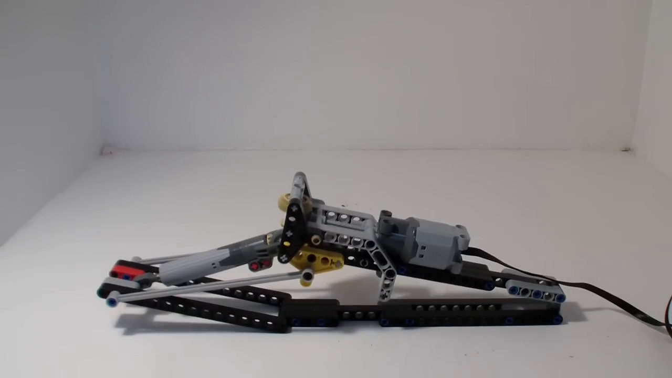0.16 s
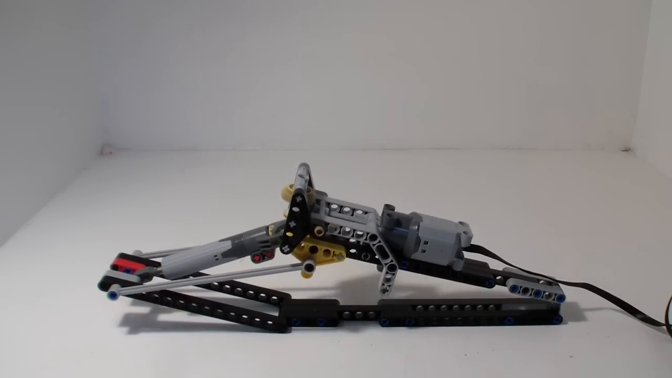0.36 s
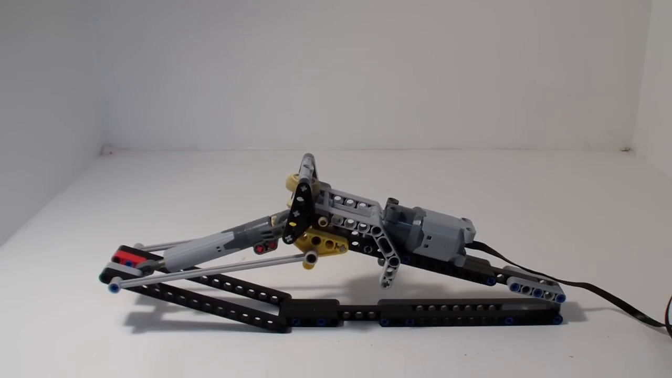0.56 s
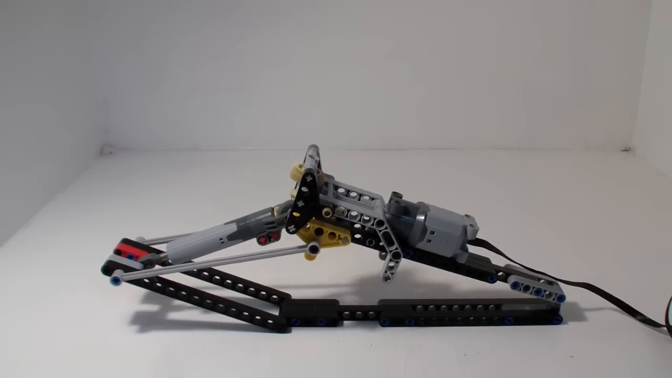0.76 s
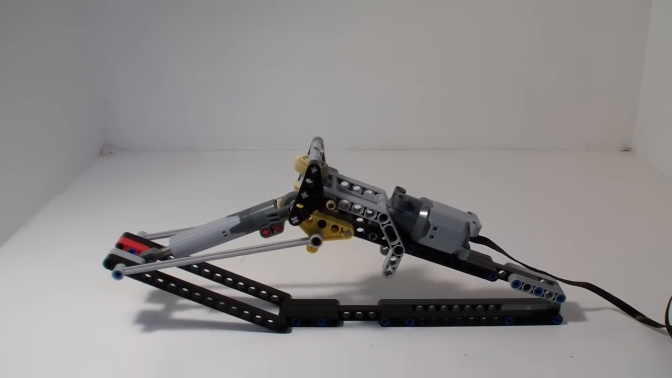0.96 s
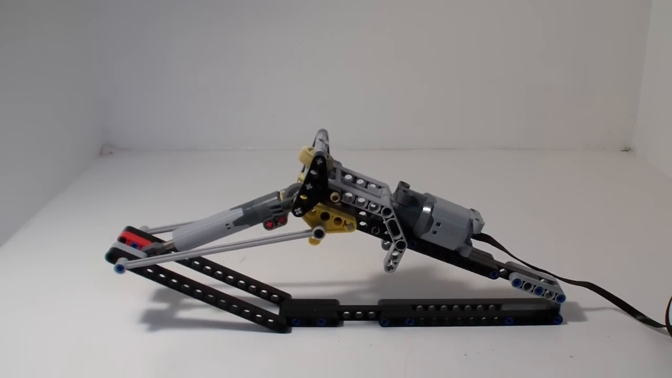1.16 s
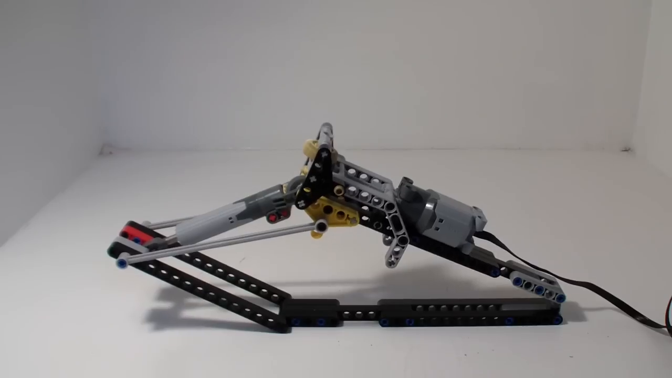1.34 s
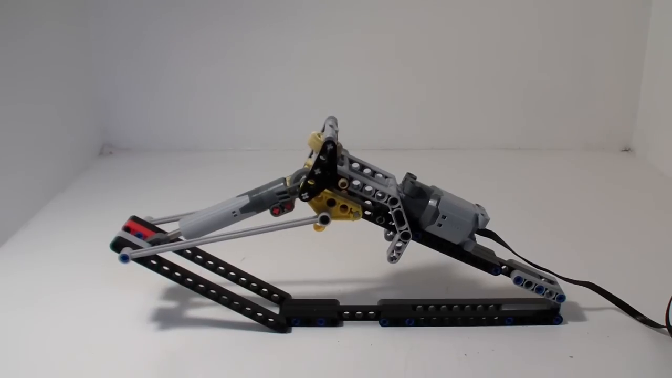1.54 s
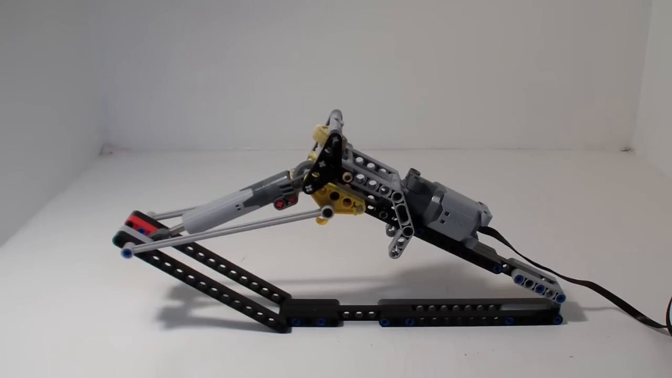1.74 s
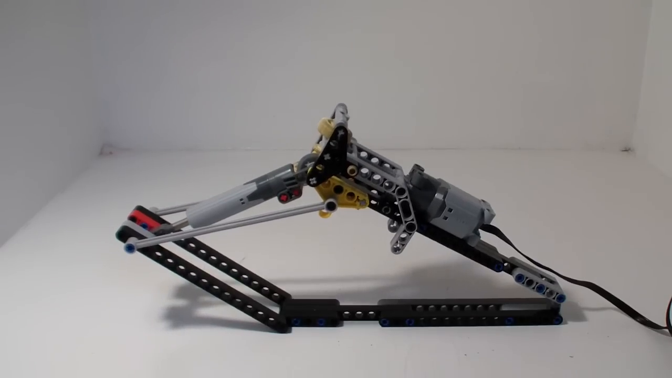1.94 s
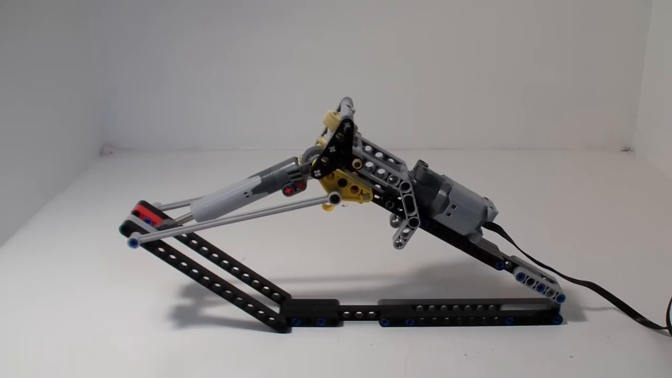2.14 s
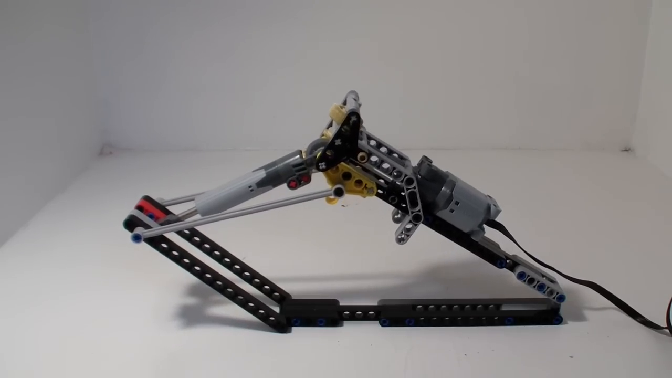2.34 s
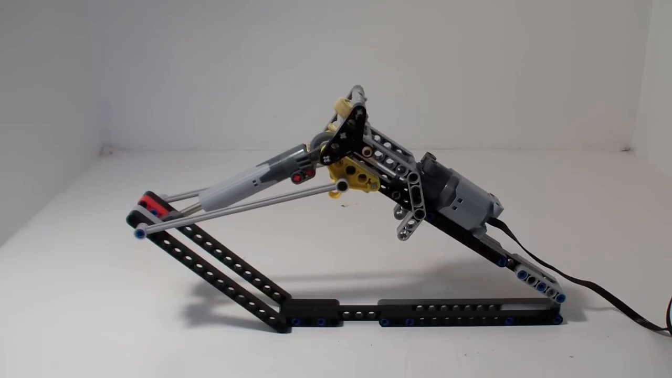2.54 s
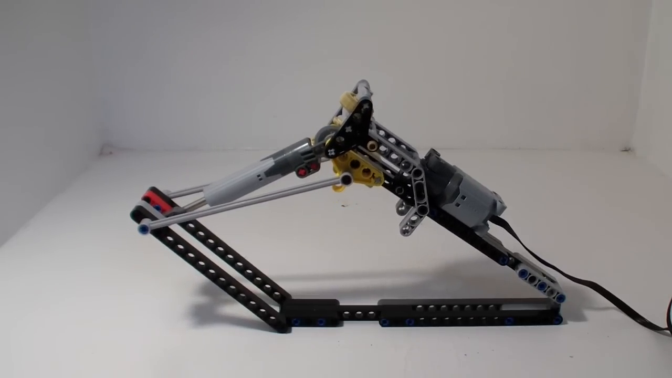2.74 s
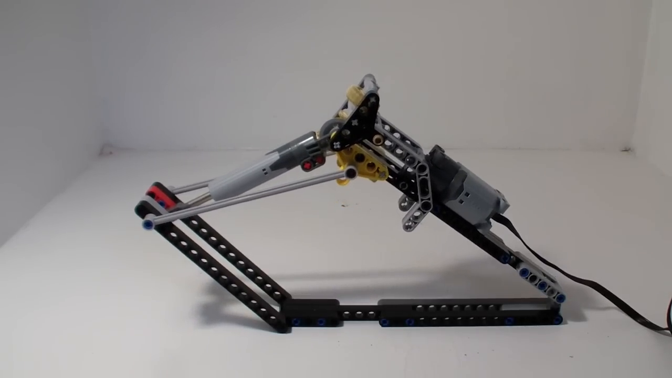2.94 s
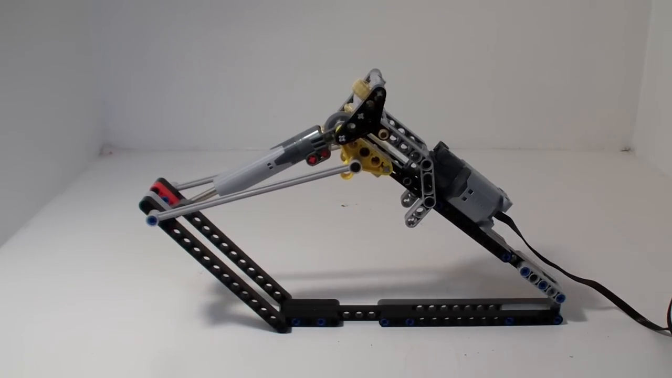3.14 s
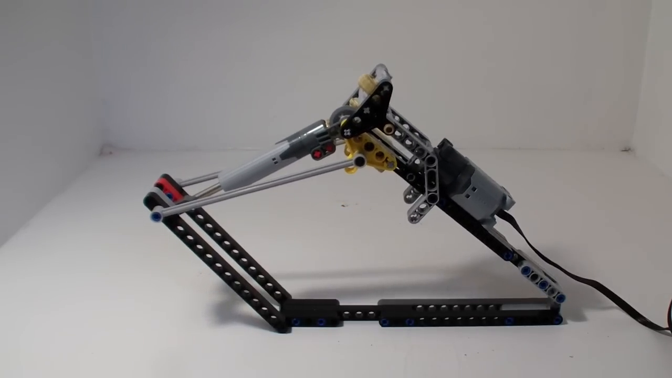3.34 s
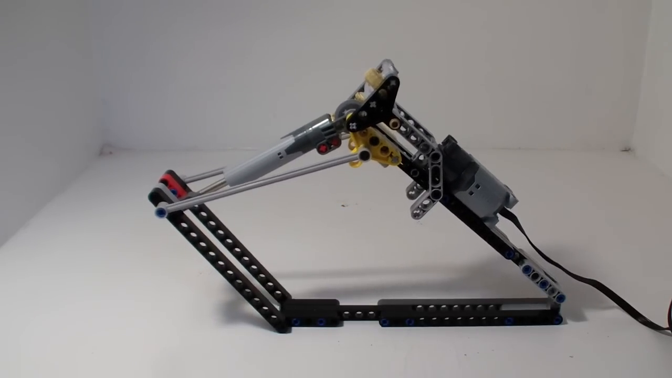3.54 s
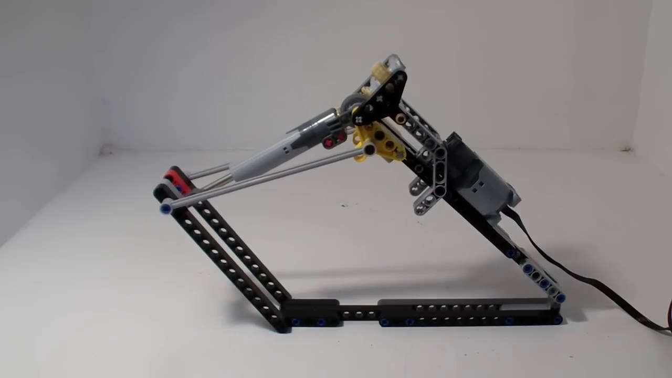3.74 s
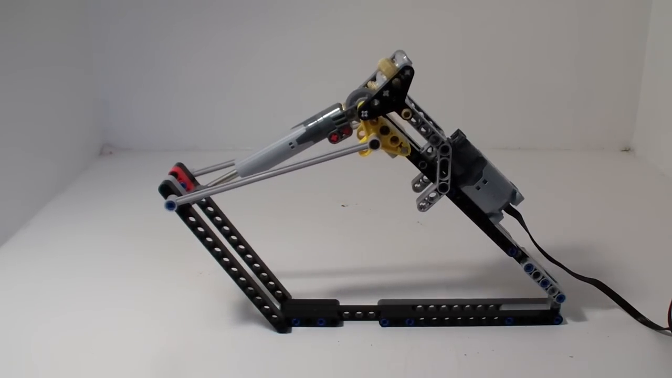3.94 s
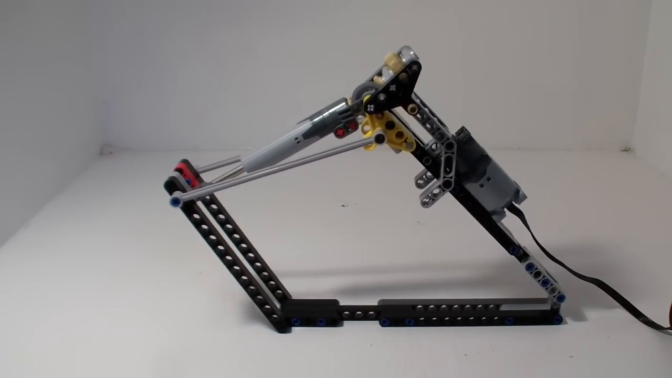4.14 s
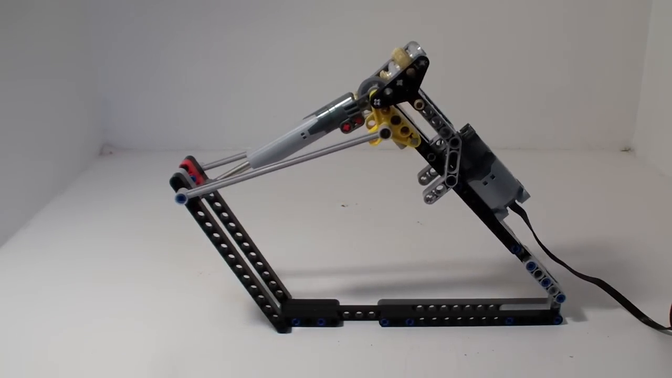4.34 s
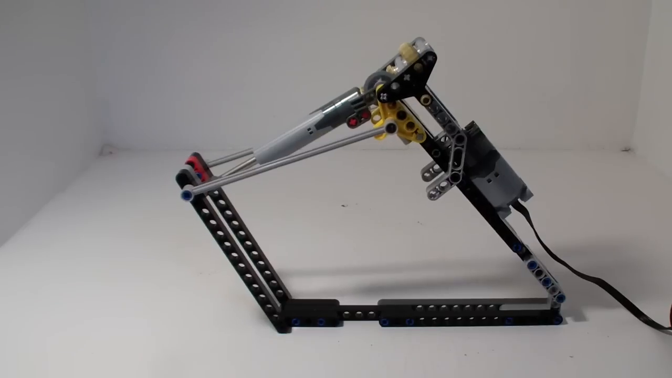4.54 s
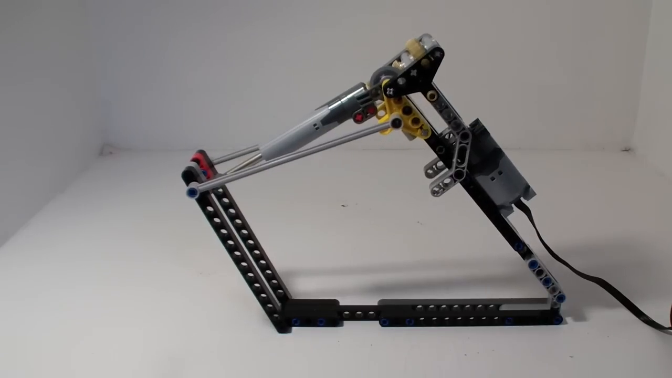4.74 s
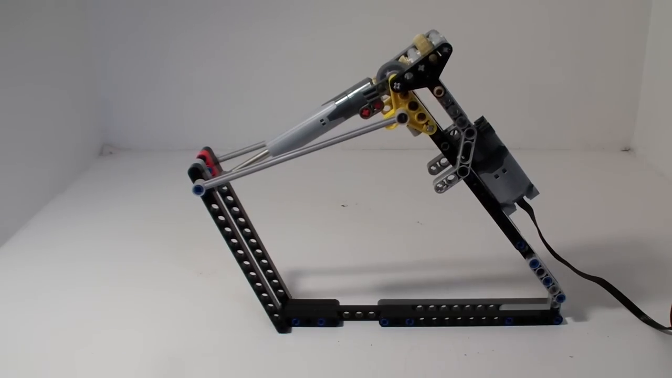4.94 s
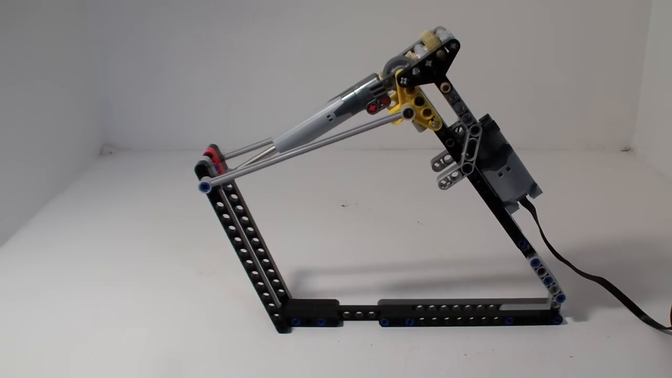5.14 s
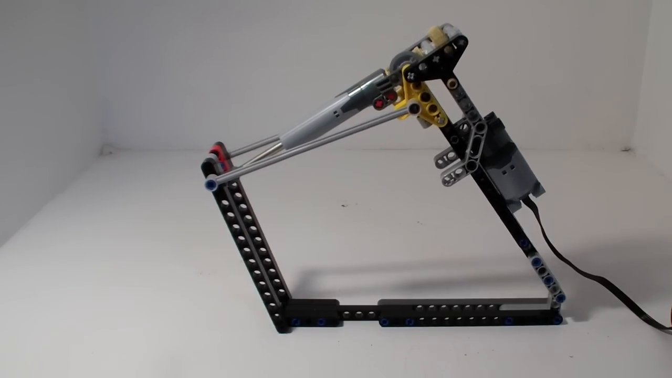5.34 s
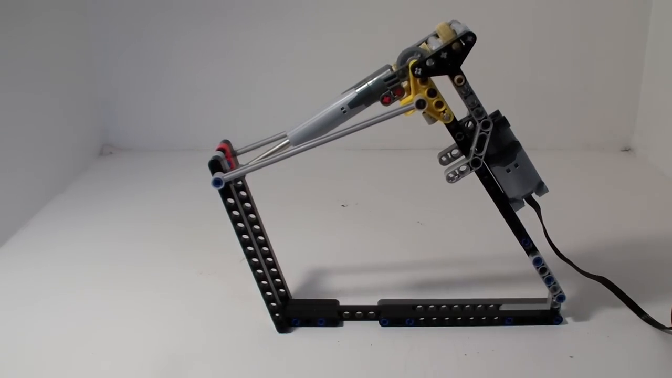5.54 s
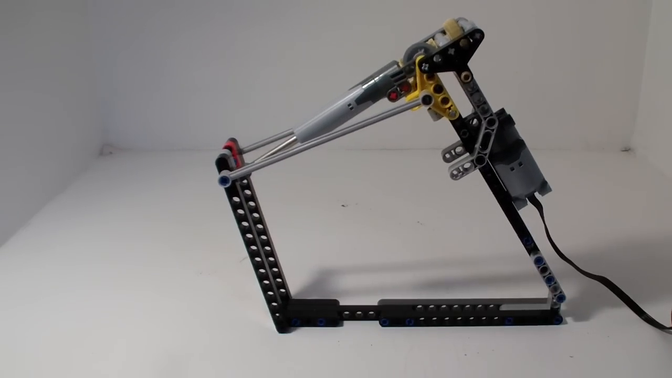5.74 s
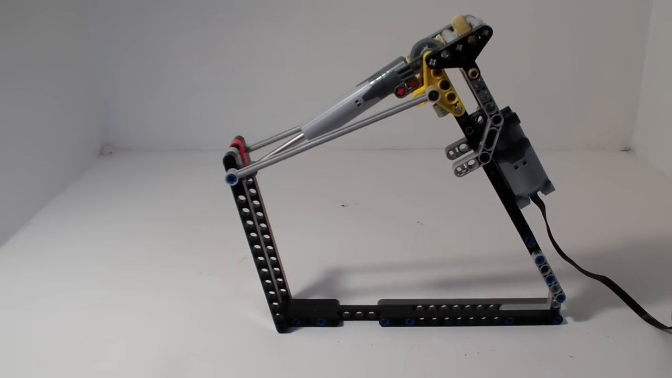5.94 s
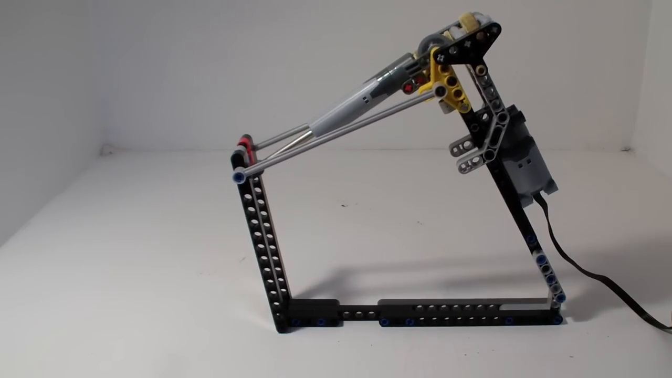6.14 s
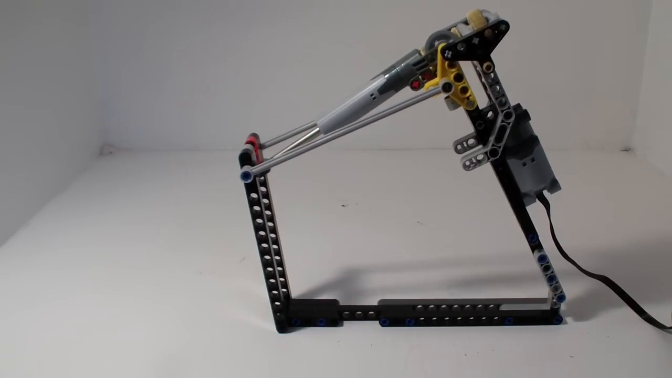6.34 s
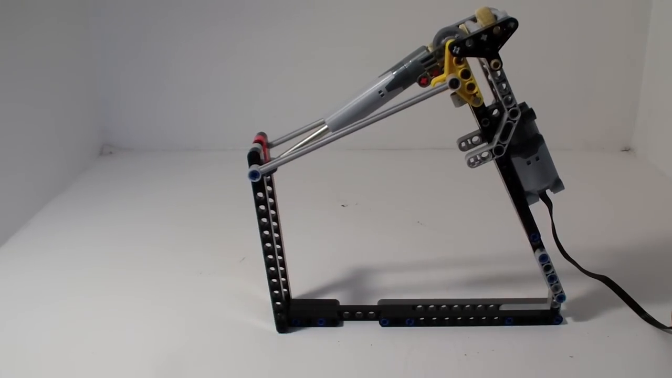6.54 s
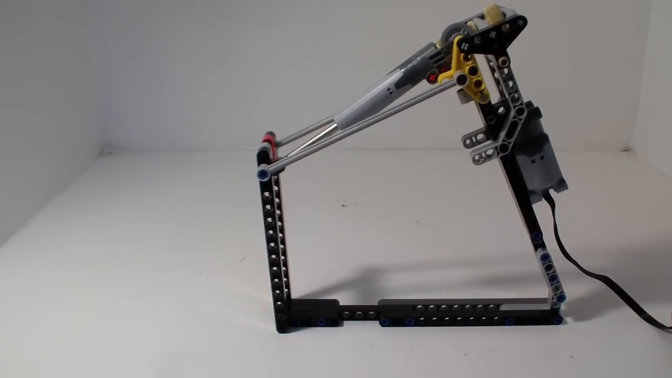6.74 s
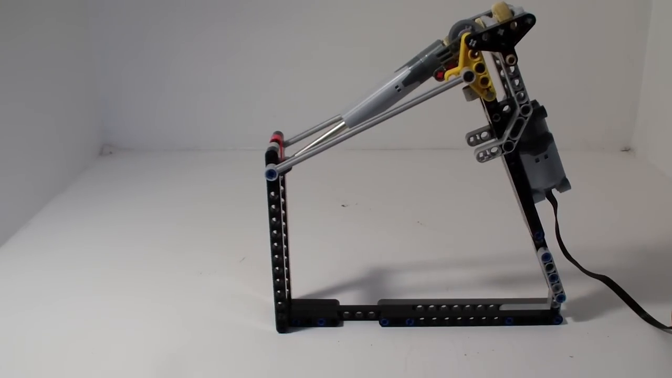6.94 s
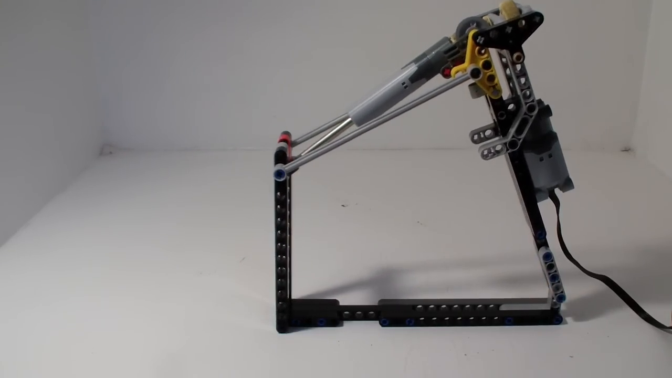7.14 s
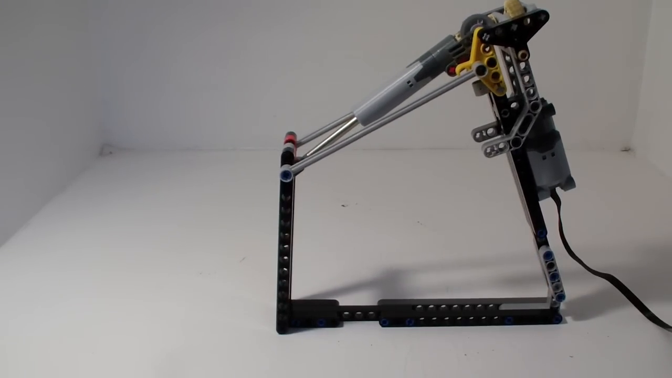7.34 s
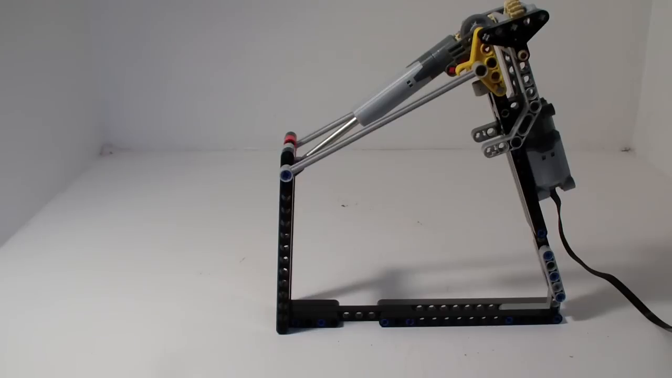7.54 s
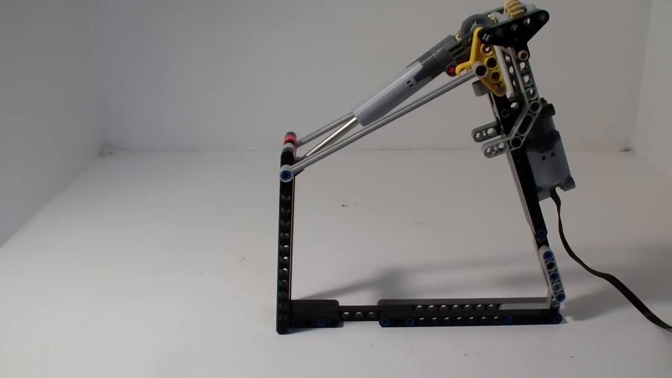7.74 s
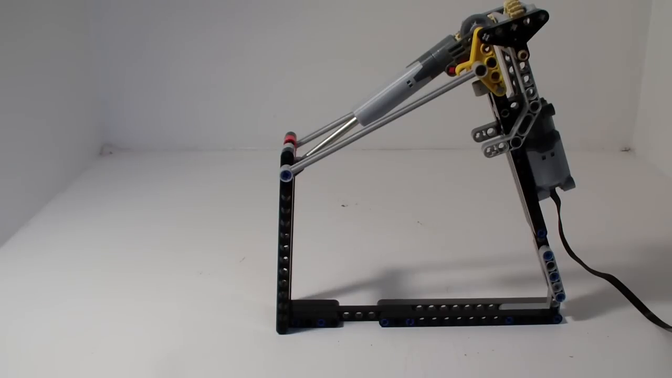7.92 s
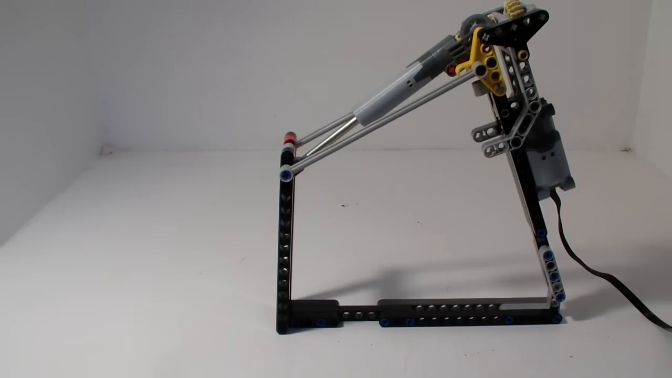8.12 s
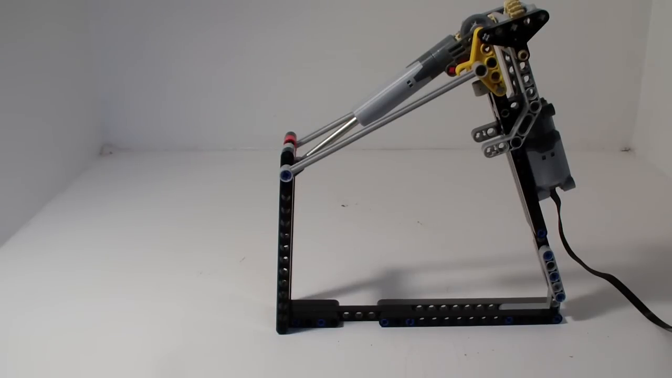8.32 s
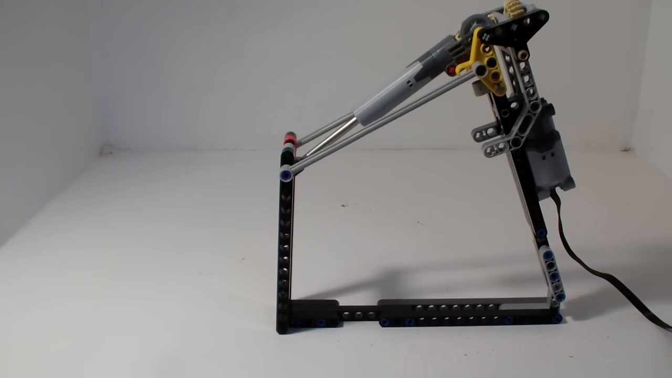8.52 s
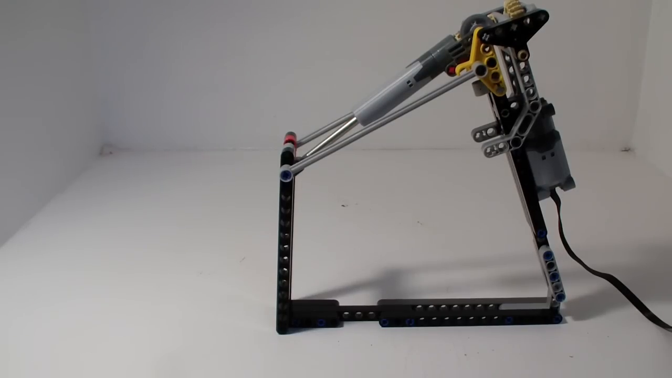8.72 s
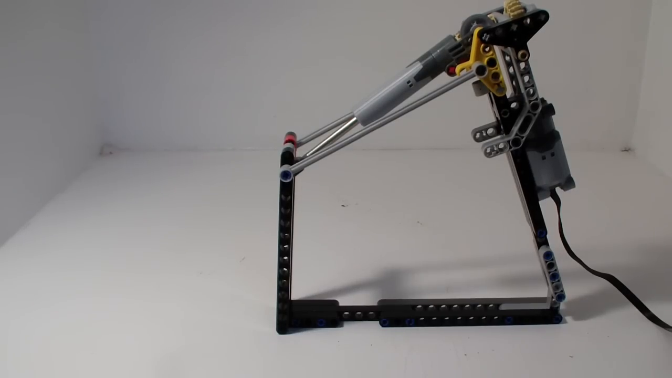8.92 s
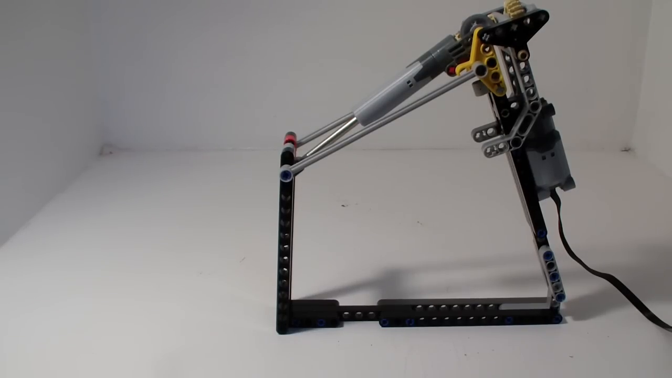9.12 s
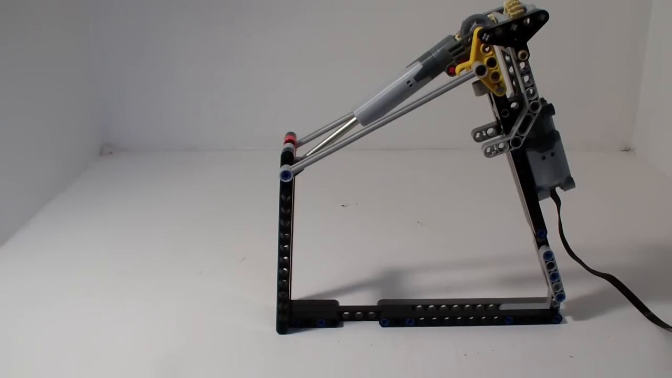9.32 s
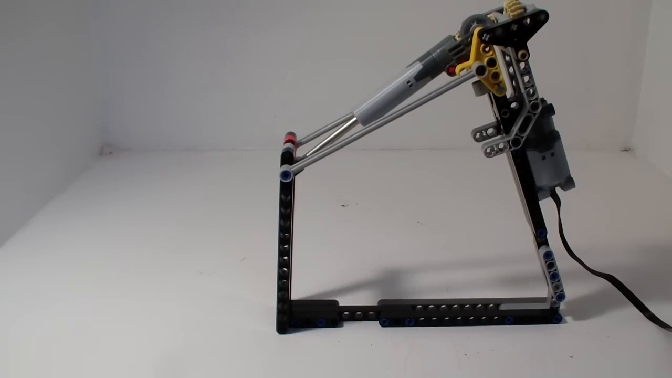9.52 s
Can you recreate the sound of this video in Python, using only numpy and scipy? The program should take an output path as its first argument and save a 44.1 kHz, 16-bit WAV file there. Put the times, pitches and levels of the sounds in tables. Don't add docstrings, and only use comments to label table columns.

```python
import sys
import numpy as np
from scipy import signal
from scipy.fft import rfft, irfft, next_fast_len
from scipy.io import wavfile

SR = 44100
rng = np.random.default_rng(int(sys.argv[2]) if len(sys.argv) > 2 else 0)


def rack_gain(trim_db):
    fader = np.asarray(trim_db, float)
    return 10 ** (fader / 20)


def wav_record(signal):
    frames = np.transpose(np.atleast_2d(signal))
    bounded = np.clip(frames, -1, 1)
    quanta = np.round(bounded * 32767).astype(np.int16)
    wavfile.write(sys.argv[1], SR, quanta)


N = 426447

# (frequency [Hz], density [dB per Hz])
HISS_MID = [(12, -25), (20, 1), (86, -1), (366, -14.5), (526, -15.5), (1440, -20.5), (1650, -12.5),
            (2010, -13), (2380, -21), (4920, -24), (6150, -25), (13100, -31.5), (15900, -27)]
HISS_SIDE = [(12, -34), (20, 7), (130, 4.5), (920, -7.5), (1480, -10.5), (1700, -16), (2010, -23),
             (2380, -9), (5810, -10.5), (15900, -22)]
# (frequency [Hz], width [Hz], level [dB], throb [dB])
DRIVE_WHINE = [(1692, 87, -54, 9), (1994, 106, -54, -2), (6137, 410, -84, -1), (15600, 160, -77, -3.5)]
# (frequency [Hz], level [dB rms])
DRIVE_LINES = [(1567, -70.5), (6259, -74), (7042, -85), (7825, -93), (15650, -79)]
# (frequency [Hz], side minus mid [dB])
SPREAD = [(60, -7), (110, -14.5), (200, -16.5), (380, -17), (700, -19), (1290, -17.5), (2380, -16.5),
          (4400, -8.5), (8120, -2.5), (15000, 1.5)]
# (frequency [Hz], density [dB per Hz])
RUMBLE = [(12, -41), (34, -17), (80, 3), (188, -4.5), (260, -15.5), (340, -49), (570, -120)]
# (frequency [Hz], density [dB per Hz])
RATTLE_LOW = [(120, -54), (200, -18.5), (283, -29), (378, -15), (564, -14.5), (1400, -10.5), (1540, -12.5),
              (1620, -8), (2020, -9), (2210, -8.5), (2850, -15), (3240, -7.5), (3550, -11.5), (8820, -10.5),
              (15500, -14)]
RATTLE_HIGH = [(120, -45), (200, -8), (288, -17), (385, -8), (564, -6), (842, -14), (1150, -7), (1540, -8),
               (1680, -5), (1810, -7), (2250, -3), (5700, -11.5), (8660, -11), (13900, -13.5), (15500, -18)]
# (frequency [Hz], width [Hz], gain low [dB], gain upright [dB])
HOUSING = [(341, 27.5, 8.5, 11), (481, 43, 5.5, 6), (573, 118, -5, -13.5), (853, 46, -11, -9.5),
           (960, 56, 2, 12), (2204, 250, 12, 0.5), (2770, 22, 9, 2.5), (2880, 350, 1.5, -0.5),
           (3866, 32, 3.5, 11), (4220, 33, 9, 6), (4830, 290, 3, 5.5), (5300, 51, 9.5, 1),
           (6020, 51.5, 5.5, 4.5), (6760, 39, 7.5, -9.5), (7050, 180, -2, 6), (7880, 690, -5, -6.5),
           (7780, 200, 3.5, 6.5), (8260, 240, 7, 4.5), (8810, 740, 2.5, 7.5), (11960, 240, -3, 4.5),
           (14100, 320, 1, 7.5)]
MULTIPLES = [.5, .75, 1, 1.33, 2, 3, 4, 5, 6, 7, 8, 9, 10, 11, 13, 14, 15, 16, 17.1, 17.71, 20, 24, 26.2,
             30.9, 38, 51, 59]
# (level away from it [dB rms], depth [dB], frame height where met [0-1], roughness [0-1])
RADIATED = [(-60, 6.5, 1, 0), (-56.5, 9, 0.52, 0.2), (-31.5, -29, 0.37, 0.39), (-47.5, -10.5, 0.14, 0.7),
            (-51, -35, 0.44, 0.07), (-47, -0.5, 0.74, 0.74), (-54.5, -12, .95, 0.2), (-59, 7, 0.42, .75),
            (-58, 10, 0, 0.56), (-60.5, 11, 0.43, 0.1), (-55.5, 14, 0, 0.38), (-45.5, 7.5, 0.92, 0.16),
            (-39, -22, 0.54, 0), (-43, 3, 0.87, 0.38), (-40, 3, 0.63, 0), (-44.5, -8, 0.77, 0.1),
            (-45.5, 10, 0.62, 0.04), (-44.5, -22, 0, 0), (-65, -35, 0, 0.51), (-34, -7.5, 0.84, 0.19),
            (-58.5, 12.5, .6, .75), (-57.5, 15, 0.56, 0.4), (-53.5, 12, .21, 0), (-48, -18, 0.8, 1),
            (-49, -28, 0.2, .75), (-51.5, 13.5, 0.2, 0.4), (-40, -13, 1, 0.6)]
# (time [s], peak level [dB], brightness [dB], burst length [ms])
SLIPS = [
    (7.2584, -1, 5, 2.6),
    (7.283, -8.5, 5, 4.4),
    (7.3074, -6.5, 0, 2.9),
    (7.3304, -7.5, 5, 1.5),
    (7.3565, -5, 7, 1.3),
    (7.38, -8, 3, 3.7),
    (7.4042, -7.5, 4, 1.2),
    (7.4264, -7.5, 2, 3.7),
    (7.4679, -4.5, 5.5, 1.6),
]
# (time [s], level [dB])
SETTLE = [
    (7.912, -41),
]
# (time [s], level [dB])
LURCH = [
    (7.346, -2),
    (7.402, -0.5),
    (7.447, -2),
]
# (frequency [Hz], width [Hz], level [dB])
CLUTCH_SHELL = [(1500, 180, -10.5), (2530, 270, -10.5), (3330, 720, 0), (4500, 790, 3.5), (5400, 1660, 0.5),
                (7900, 2000, -0.5), (9600, 1700, -1), (11100, 2800, -2), (14600, 1470, -8)]
# (frequency [Hz], level [dB], decay by 60 dB [s])
FRAME = [(73.8, -30.5, .7), (170, -33.5, 3.0), (205, -28, .3), (327, -43, 1.2), (356, -54, 1.4),
         (490, -32, .24), (690, -37, .19), (956, -40, .18), (3680, -45, .4)]
# (frequency [Hz], density [dB per Hz])
THUD = [(40, -31), (90, 11.5), (220, -40.5), (350, 7.5), (600, -1), (1000, 2), (1600, -28.5), (3000, -50)]

HUM_HZ, HUM_WIDTH_HZ, HUM_DB = 75, 9, -60
THROB_S, THROB_AT_S = .06, 8.04
BOX_T60_S, BOX_DB = .3, -17
CUTOFF_HZ = 15740

END_STOP_S, CLUTCH_OPENS_S, POWER_OFF_S = 7.178, 7.259, 7.44
START_TURNS, EASING_TURNS, LEVELLING_TURNS = 126.15, 4.8, 1.15
FREE_TURNS, SAG_TURNS, SAG_S = 1.6, 1.0, .12
BOG_TURNS_PER_S2, SLIP_TURNS_PER_S2 = 300, 65
KNOCK_S, KNOCK_DB = .186, 6

TONE_DB, TONE_BOG_DB, TONE_FREED_DB, TONE_FADE_DB_PER_S = 1.02, -11, 9, 101
RATTLE_DB, RATTLE_RISE_DB, RATTLE_FREED_DB, RATTLE_REGAIN_DB, RATTLE_OFF_DB = -23, -1.5, -7, 2.5, -2
RATTLE_COAST_DB_PER_S2 = 794
RUMBLE_DB, RUMBLE_RISE_DB, RUMBLE_START_DB, RUMBLE_START_S = -52, 13, 10, 0.16
RUMBLE_COAST_DB_PER_S, RUMBLE_LINGERS_S = 240, 0.13

GEAR_DOWN = 24
MESH = 17.71
TIGHT_SPOT = .62
SWELL_DB = 4.4
TUNING_SPAN = 0.26
POSES, POSE_STEP_S = 11, .75
RIPPLE_DB, RIPPLE_HZ = 4.5, 80
UNLOADED_HZ = 8000
SNAP = 5.5


def rms_one(x):
    return x / np.sqrt(np.mean(x ** 2) + 1e-20)


def at_hz(points, hz):
    table = np.array(points)
    return np.interp(np.log(hz + 1), np.log(table[:, 0] + 1), table[:, 1])


def wander(rate, count):
    r = np.exp(-80 * np.pi * rate / SR)
    noise = rng.standard_normal(count + 1000)
    return rms_one(signal.lfilter([1], [1, -2 * r, r * r], noise)[1000:])


def drift(rate):
    count = N // 40 + 2
    return np.interp(np.arange(N) / 40, np.arange(count), wander(rate, count))


def ramp(start_s, end_s):
    return np.clip((np.arange(N) / SR - start_s) / (end_s - start_s), 0, 1)


def since(start_s):
    return np.maximum(np.arange(N) / SR - start_s, 0)


def colour(x, gain_db, turn=1):
    size = next_fast_len(len(x))
    gain = rack_gain(gain_db(np.arange(size // 2 + 1) * SR / size))
    return irfft(rfft(x, size) * turn * gain, size)[:len(x)]


def resonate(x, hz, width):
    r = np.exp(-np.pi * width / SR)
    poles = [1, -2 * r * np.cos(2 * np.pi * hz / SR), r * r]
    return signal.lfilter([(1 - r * r) / 2, 0, (r * r - 1) / 2], poles, x + 1e-18)


def stereo(mid, side):
    return np.array([mid + side, mid - side])


def room_and_recorder():
    mid = rack_gain(-51.5) * rms_one(colour(rng.standard_normal(N), lambda hz: at_hz(HISS_MID, hz)))
    side = rack_gain(-55) * rms_one(colour(rng.standard_normal(N), lambda hz: at_hz(HISS_SIDE, hz)))
    hum = resonate(resonate(rng.standard_normal(N), HUM_HZ, HUM_WIDTH_HZ), HUM_HZ, HUM_WIDTH_HZ)
    mid = mid + rack_gain(HUM_DB) * rms_one(hum)
    t = np.arange(N) / SR
    throb = np.cos(2 * np.pi * (t - THROB_AT_S) / THROB_S)
    whine = np.zeros(N)
    for hz, width, db, throb_db in DRIVE_WHINE:
        noise = rng.standard_normal(N) * rack_gain(throb_db * throb)
        whine += rack_gain(db) * rms_one(resonate(resonate(noise, hz, width), hz, width))
    for hz, db in DRIVE_LINES:
        whine += np.sqrt(2) * rack_gain(db) * np.sin(2 * np.pi * hz * t)
    return stereo(mid, side) + np.array([rack_gain(3.5) * whine, rack_gain(-3) * np.roll(whine, 12)])


def box(x):
    t = np.arange(SR // 2) / SR
    noise = rng.standard_normal((2, len(t))) * (t > .004)
    dull = signal.lfilter([.35], [1, -.65], noise)
    tail = dull * rack_gain(-60 * t / BOX_T60_S) + .5 * (noise - dull) * rack_gain(-60 * t / (0.5 * BOX_T60_S))
    tail = tail / np.sqrt((tail[0] ** 2).sum())
    mid, side = rack_gain(BOX_DB) * signal.fftconvolve(x.mean(0)[None], tail, axes=1)[:, :N]
    return stereo(mid, 0.63 * side)


def drive():
    height, bog = ramp(0, END_STOP_S), ramp(END_STOP_S, CLUTCH_OPENS_S)
    freed = ramp(CLUTCH_OPENS_S, CLUTCH_OPENS_S + .004)
    loaded = ramp(KNOCK_S - .05, KNOCK_S + .05)
    speed = START_TURNS + EASING_TURNS * height - LEVELLING_TURNS * height ** 2
    speed += FREE_TURNS * (1 - loaded) - SAG_TURNS * loaded * np.exp(-since(KNOCK_S + .05) / SAG_S)
    speed -= BOG_TURNS_PER_S2 * (CLUTCH_OPENS_S - END_STOP_S) * bog
    speed -= SLIP_TURNS_PER_S2 * since(CLUTCH_OPENS_S)
    tone_db = TONE_DB + TONE_BOG_DB * bog + TONE_FREED_DB * freed
    tone_db -= TONE_FADE_DB_PER_S * since(CLUTCH_OPENS_S)
    rattle_db = RATTLE_DB + RATTLE_RISE_DB * height + RATTLE_FREED_DB * freed
    rattle_db += RATTLE_REGAIN_DB * ramp(CLUTCH_OPENS_S, POWER_OFF_S)
    rattle_db += RATTLE_OFF_DB * ramp(POWER_OFF_S, POWER_OFF_S + 0.0071)
    rattle_db -= RATTLE_COAST_DB_PER_S2 * since(POWER_OFF_S) ** 2
    rumble_db = RUMBLE_DB + RUMBLE_RISE_DB * height + RUMBLE_START_DB * np.exp(-since(0) / RUMBLE_START_S)
    rumble_db -= RUMBLE_COAST_DB_PER_S * since(POWER_OFF_S + RUMBLE_LINGERS_S)
    return height, np.maximum(speed, 0), tone_db, rattle_db, rumble_db


def rumble(rumble_db):
    shake = rng.standard_normal(N)
    mid = colour(shake, lambda hz: at_hz(RUMBLE, hz))
    side = colour(0.61 * rng.standard_normal(N) - shake,
                  lambda hz: at_hz(RUMBLE, hz) + at_hz(SPREAD, hz) - 2.0)
    return rack_gain(rumble_db) * stereo(mid, side) / mid.std()


def housing_colour(upright):
    ripples = np.convolve(rng.standard_normal(SR // RIPPLE_HZ + 3), [.5, 1, .5], "valid") / np.sqrt(1.5)

    def housing_db(hz):
        gain = (1 - upright) * at_hz(RATTLE_LOW, hz) + upright * at_hz(RATTLE_HIGH, hz)
        for centre, width, low, high in HOUSING:
            gain = gain + ((1 - upright) * low + upright * high) / (1 + (2 * (hz - centre) / width) ** 2)
        comb = np.interp(hz, np.arange(len(ripples)) * RIPPLE_HZ / 2, np.minimum(ripples, .4))
        return gain + RIPPLE_DB * comb * np.clip(hz / 6000 - .3, 0, 1)
    return housing_db


def rattle(turns, rattle_db):
    beat_db = 0.106 * np.cos(2 * np.pi * (turns / GEAR_DOWN - .7)) + .5 * np.cos(2 * np.pi * turns)
    beat = rack_gain(beat_db + 0.45 * drift(19.0) + 0.69 * drift(190.0))
    step = round(POSE_STEP_S * SR)
    out = np.zeros((2, N + step))
    fade = np.sqrt(1 - abs(np.arange(2 * step) / step - 1))
    for pose in range(POSES):
        housing_db = housing_colour(min(pose / (POSES - 2), 1))
        hits = np.roll(beat, (1 - pose) * step)[:2 * step] * rng.standard_normal((2, 2 * step))
        mid = colour(hits[0], housing_db)
        side = colour(0.51 * hits[0] + 0.67 * hits[1], lambda hz: housing_db(hz) + at_hz(SPREAD, hz), turn=1j)
        out[:, pose * step:(pose + 2) * step] += fade * stereo(mid, side) / mid.std()
    loud, freed = out[:, step:], ramp(CLUTCH_OPENS_S, CLUTCH_OPENS_S + .004)
    soft = signal.lfilter(*signal.butter(2, UNLOADED_HZ, fs=SR), loud)
    return rack_gain(rattle_db) * ((1 - freed) * loud + freed * soft)


def motor_tones(height, speed, turns, tone_db):
    count = round(7.6 * SR)
    out = np.zeros((2, N))
    fine, coarse = np.arange(count), np.arange(0, count + 40, 40)
    output = 2 * np.pi * (turns / GEAR_DOWN - TIGHT_SPOT)
    swell = (np.cos(output) - 0.33 * np.cos(2 * output + .5))[coarse]
    lead = 0.0058 * np.sin(output - 1.2) + 0.0042 * drift(7.3)
    stall = np.clip((speed.max() - speed[coarse]) / 8, 0, 1)
    stall = stall * (coarse > 7 * SR) * (coarse < 7.26 * SR)
    for k, (away_db, depth_db, met_at, rough) in zip(MULTIPLES, RADIATED):
        level_db = away_db + depth_db / (1 + ((height[coarse] - met_at) / TUNING_SPAN) ** 2) + tone_db[coarse]
        level_db += (12.0 if k == MESH else -3.0) * stall
        level_db += SWELL_DB * swell * min(k / 13, 1, 20 / k) ** 2 * (1 - stall)
        rough = np.clip(rough, 0, .97) * (1 - .7 * stall)
        along = np.sqrt(1 - rough ** 2) + rough * np.sqrt(.5) * wander(7.8 + 1.43 * k, len(coarse))
        across = rough * np.sqrt(.5) * wander(4.0 + 0.15 * k, len(coarse))
        level = np.sqrt(2) * rack_gain(level_db)
        along = np.interp(fine, coarse, level * along)
        across = np.interp(fine, coarse, level * across)
        angle = (2 * np.pi * ((k * (turns + lead)[:count] + rng.random()) % 1)).astype(np.float32)
        sine, cosine = np.sin(angle), np.cos(angle)
        mid = along * sine + across * cosine
        side = rack_gain(at_hz(SPREAD, 128 * k)) * (along * cosine - across * sine)
        out[:, :count] += stereo(mid, side)
    return out


def slip_burst(bright_db, burst_ms):
    t = np.arange(SR // 20) / SR
    contact = np.exp(-(t / burst_ms / 0.0013) ** 2.2) + 0.38 * np.exp(-t / 0.0073)
    burst = rng.standard_normal((2, len(t))) * (1 - np.exp(-t / 0.00036)) * contact
    burst[:, 12] += SNAP * (bright_db > -20)
    both, sign = np.zeros((2, len(t))), 1
    for (hz, width, db), vary_db in zip(CLUTCH_SHELL, rng.normal(0, 0.91, len(CLUTCH_SHELL))):
        gain = rack_gain(db + vary_db + bright_db * np.clip(hz / 5000 - .5, 0, 1)) / np.sqrt(width)
        both += sign * gain * resonate(burst, hz, width) * [[1], [rack_gain(at_hz(SPREAD, hz) - 2)]]
        sign = -sign
    mid, side = both
    loudest = np.sort(mid ** 2)[-SR // 1000:]
    return stereo(mid, side) / np.sqrt(np.mean(loudest) * 2)


def ringing(t):
    return [rack_gain(db - 60 * t / t60) * np.sin(2 * np.pi * hz * t) for hz, db, t60 in FRAME]


def clutch():
    out, jolts = np.zeros((2, N)), np.zeros(N)
    for s, peak_db, bright_db, burst_ms in SLIPS + [(s, db, -40, 6.0) for s, db in SETTLE]:
        burst = slip_burst(bright_db, burst_ms)
        at = round(s * SR)
        out[:, at:at + burst.shape[1]] += rack_gain(peak_db) * burst
        jolts[at] = rack_gain(peak_db + 0.5)
    t = np.arange(2 * SR) / SR
    shudder = signal.fftconvolve(jolts, rack_gain(-27.5 - 60 * t / 0.17))[:N]
    thud = shudder * rms_one(colour(rng.standard_normal(N), lambda hz: at_hz(THUD, hz)))
    rocks = 0.12 * jolts * rng.normal(0, 1, N)
    for s, db in LURCH:
        rocks[round(s * SR)] = rack_gain(db)
    ring = signal.fftconvolve(rocks, sum(ringing(t)))[:N]
    knock = rack_gain(KNOCK_DB) * sum(ringing(since(KNOCK_S))[6:8])
    return out + ring + thud + knock


def scene():
    height, speed, tone_db, rattle_db, rumble_db = drive()
    turns = np.cumsum(speed) / SR
    slips = clutch()
    mechanism = rumble(rumble_db) + rattle(turns, rattle_db) + motor_tones(height, speed, turns, tone_db)
    return room_and_recorder() + box(slips) + mechanism + slips


def band_limit(x):
    return signal.sosfilt(signal.butter(12, 16800, fs=SR, output="sos"), x)


def record(dry):
    clipped = np.clip(dry, -.97, .97)
    mix = np.array([colour(channel, lambda hz: -120 * (hz > CUTOFF_HZ)) for channel in clipped])
    return band_limit(mix)


dry = scene()
out = record(dry)
wav_record(out)
```